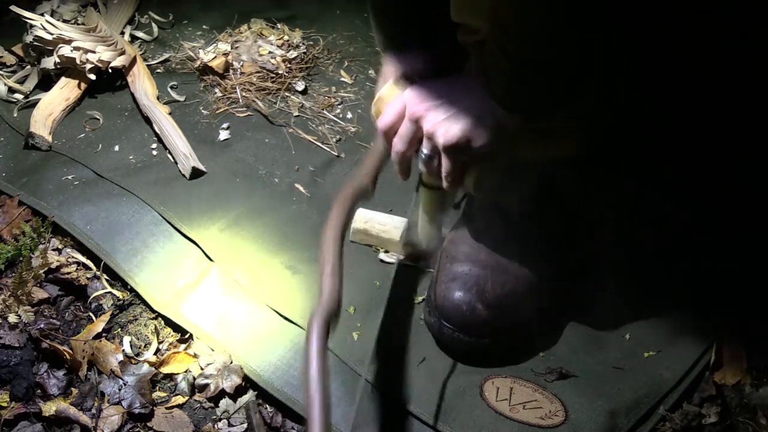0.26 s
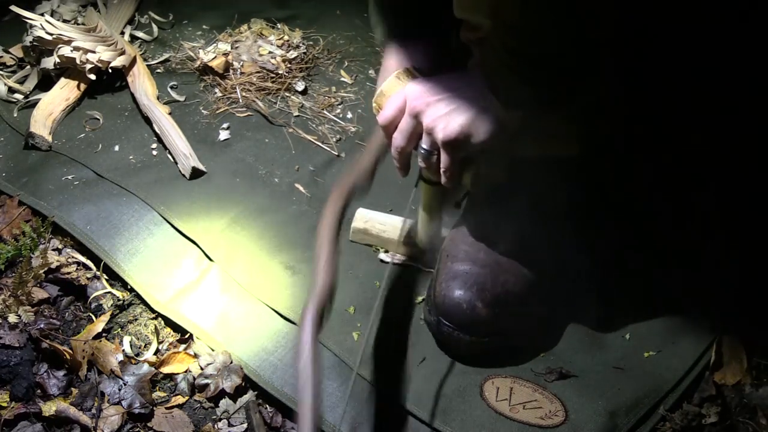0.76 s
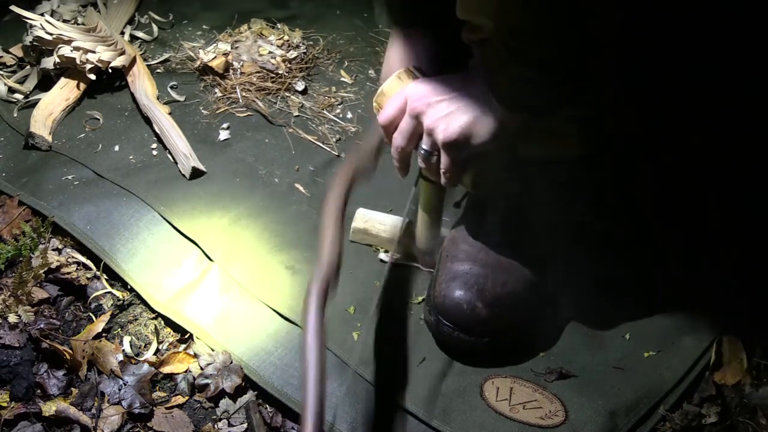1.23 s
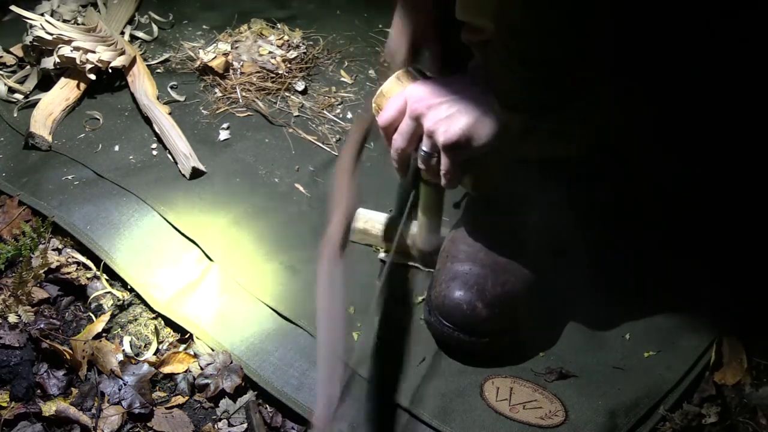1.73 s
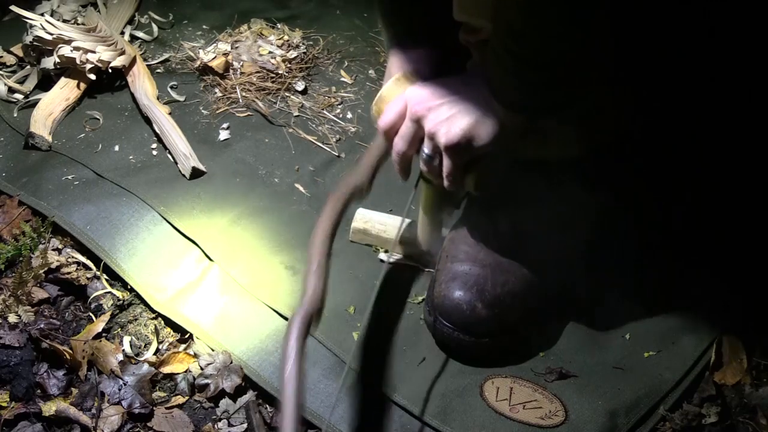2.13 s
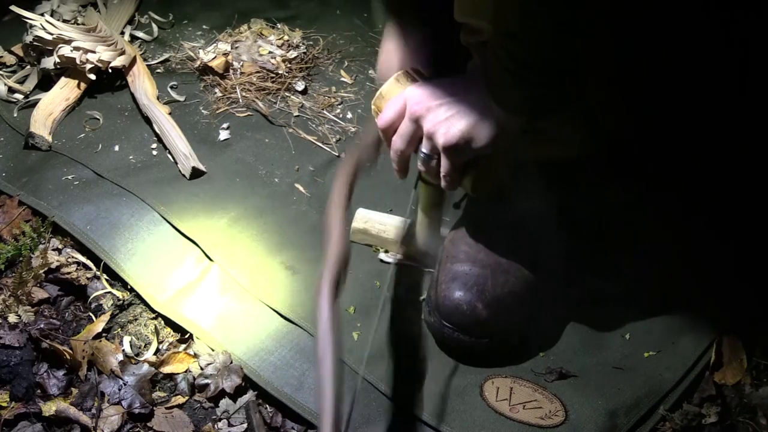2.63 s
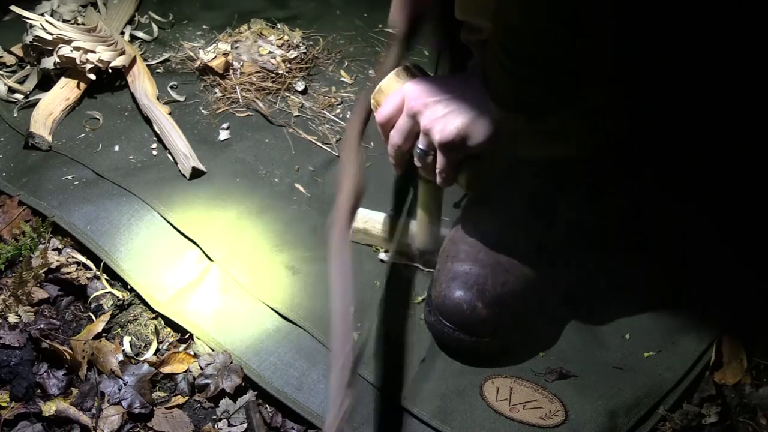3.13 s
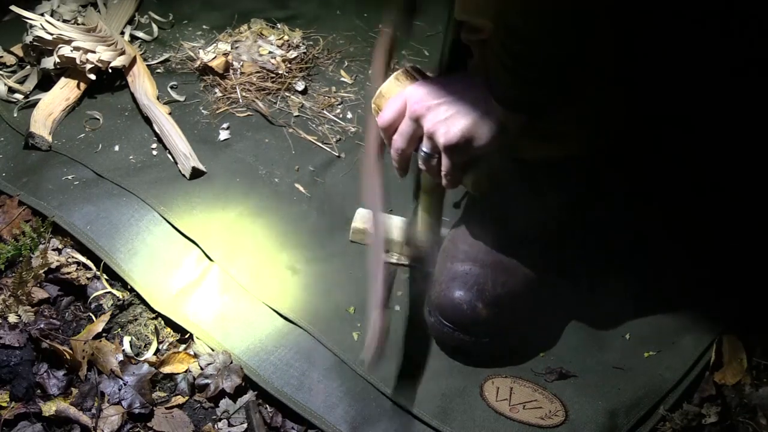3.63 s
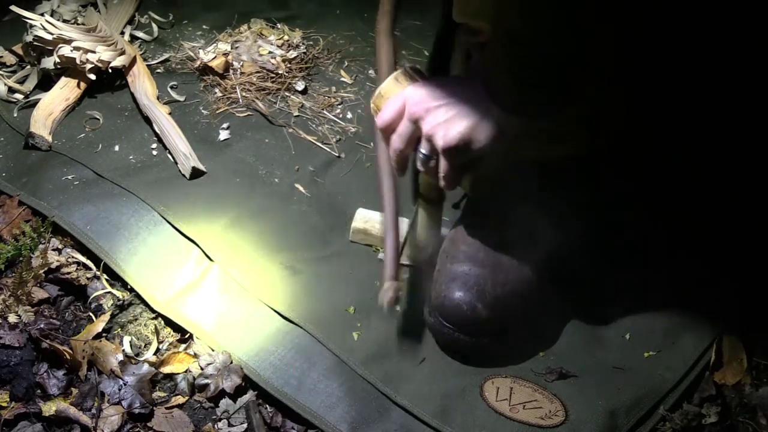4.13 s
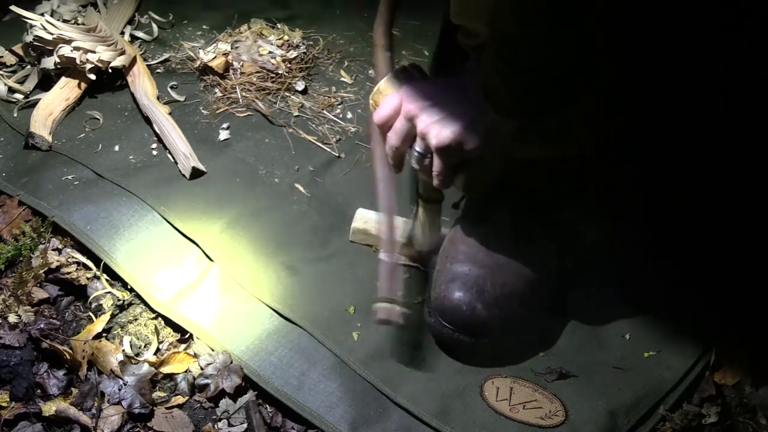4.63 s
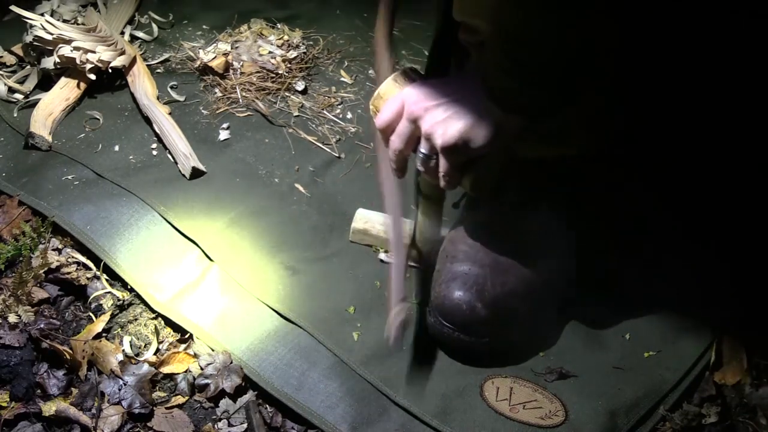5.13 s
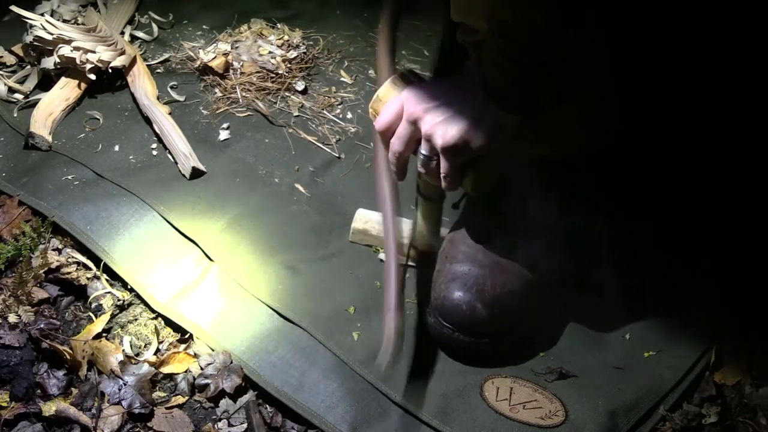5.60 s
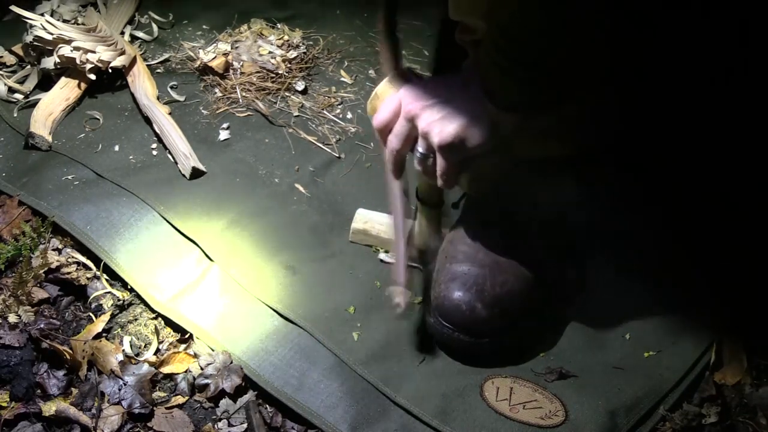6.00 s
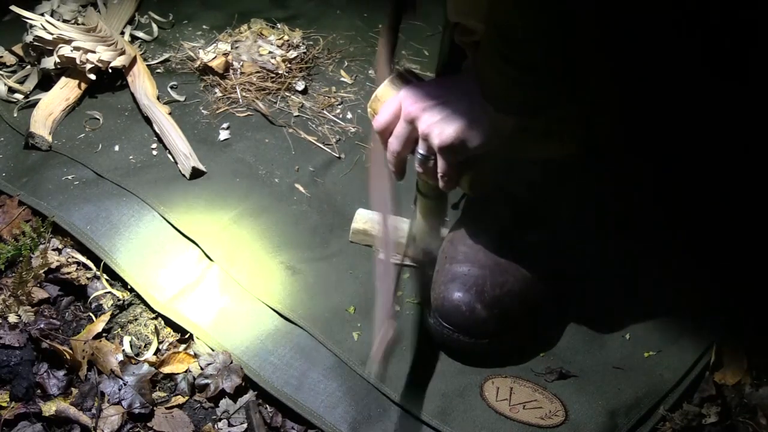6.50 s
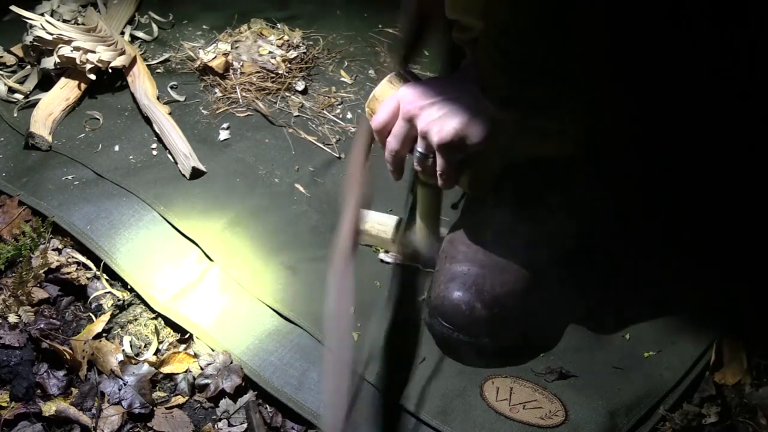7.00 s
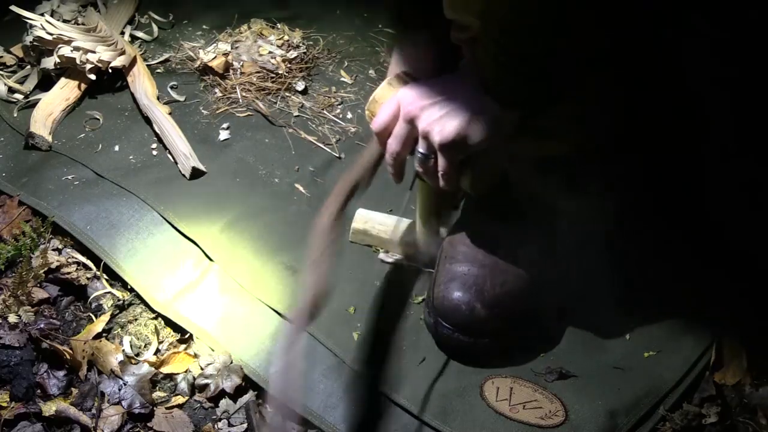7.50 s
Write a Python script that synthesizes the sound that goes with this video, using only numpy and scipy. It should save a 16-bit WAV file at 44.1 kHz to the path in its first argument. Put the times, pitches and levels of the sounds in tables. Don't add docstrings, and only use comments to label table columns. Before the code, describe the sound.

Very close in quiet woodland, a wooden spindle is driven back and forth by a bow in a fireboard notch. Steady grinding strokes, roughly four a second, mix low drumming, woody grit and bright fibre rasp. The cord snaps at the turns and the tip knocks. Piercing squeaks burst out early, once near the middle and again close to the end, over faint hiss and rumble.

```python
import sys
import numpy as np
from scipy import signal
from scipy.fft import rfft, irfft, next_fast_len
from scipy.io import wavfile
from scipy.ndimage import uniform_filter1d

SR = 44100
rng = np.random.default_rng(int(sys.argv[2]) if len(sys.argv) > 2 else 0)


def how_loud(loudness_db):
    steps = np.asarray(loudness_db, float) / 20
    return 10 ** steps


def store_wav(level_fs):
    pcm = np.round(np.clip(np.atleast_2d(level_fs), -1, 1) * 32767)
    wavfile.write(sys.argv[1], SR, pcm.T.astype(np.int16))


N = 341775
OVERLOAD = 0.53


def rms_one(x):
    return x / np.sqrt(np.mean(x ** 2) + 1e-20)


def at_hz(points, hz):
    table = np.array(points)
    return np.interp(np.log(hz + 1), np.log(table[:, 0] + 1), table[:, 1])


def resonate(x, hz, width_hz, count=1):
    r = np.exp(-np.pi * width_hz / SR)
    section = [(1 - r * r) / 2, 0, (r * r - 1) / 2, 1, -2 * r * np.cos(2 * np.pi * hz / SR), r * r]
    return signal.sosfilt([section] * count, x)


def judder(hz, width_hz):
    return rms_one(resonate(rng.standard_normal(N), hz, width_hz))


# (top speed [s], turn that ends it [s], effort [dB], grip of the tip [dB])
PUSH_STROKES = [(0.0, 0.082, -33, -6), (0.455, 0.566, -32, -0.5), (0.902, 1.039, -34, 0.5),
                (1.379, 1.49, -37.5, 6), (1.865, 1.964, -36, 1), (2.32, 2.431, -35, 0.5),
                (2.807, 2.882, -32, -1.5), (3.227, 3.344, -31.5, -1.5), (3.661, 3.789, -33, 1),
                (4.158, 4.253, -34.5, 0), (4.622, 4.727, -33, -1), (5.074, 5.18, -33, 0.5),
                (5.521, 5.629, -31.5, 1), (5.986, 6.075, -30.5, -1), (6.424, 6.527, -29, -3.5),
                (6.842, 6.965, -32.5, 2.5), (7.293, 7.409, -36, 1), (7.717, 7.847, -38.5, -2)]
# (turn that ends it [s], effort [dB], grip of the tip [dB])
PULL_STROKES = [(.327, -34, 0), (.803, -31.5, -2.5), (1.262, -37.5, -0.5), (1.724, -39, 2),
                (2.192, -35.5, -0.7), (2.653, -35, 0.9), (3.116, -34, 1.5), (3.562, -32.5, 0.8),
                (4.026, -38.5, -.3), (4.491, -35.5, 1.5), (4.956, -33.5, -0.5), (5.4, -33, -1),
                (5.852, -32.5, 0.2), (6.302, -32, -1.5), (6.745, -30.5, -0.2), (7.187, -36.5, 3),
                (7.629, -39, -2)]
# (in a push [dB], at its turn [dB], in a pull [dB], at its turn [dB])
LAYER_LEVELS = [
    (-12.5, -24.5, -13.5, -28.5),
    (0.24, -32, -0.1, -28.5),
    (1.1, -26, -0.7, -46),
    (-9, -32, -7.5, -47.5),
]


def strokes():
    push_top, push_end, push_db, push_grip_db = np.transpose(PUSH_STROKES)
    after_the_end = (8.1, -40, 0)
    pull_end, pull_db, pull_grip_db = np.transpose(PULL_STROKES + [after_the_end])
    pull_top = push_end + 0.5225 * (pull_end - push_end)
    s = np.ravel([push_top, push_end, pull_top, pull_end], order="F")
    effort_db = np.ravel([push_db, pull_db, pull_db, pull_db], order="F")
    levels_db = effort_db + np.tile(LAYER_LEVELS, len(PUSH_STROKES))
    levels_db[2, ::2] += np.ravel([push_grip_db, pull_grip_db], order="F")
    return s, levels_db


def stroke_place():
    s = strokes()[0]
    return np.interp(np.arange(N) / SR, s, np.arange(len(s)))


def stroke_gains(rises, falls):
    s, levels_db = strokes()
    place = stroke_place()
    row = np.minimum(place.astype(int), len(s) - 2)
    part = place - row
    gains = []
    for db, rise, fall in zip(levels_db, rises, falls):
        first, second = how_loud(db)[row], how_loud(db)[row + 1]
        up = second > first
        quarter = np.sin(np.pi / 2 * np.where(up, part, 1 - part) ** 0.85)
        speed = quarter ** np.where(up, rise, fall)
        gains.append(np.minimum(first, second) + np.abs(second - first) * speed)
    return gains


def friction(modes, per_s, spread_db, smooth, uneven_db, turn):
    torn = rng.random(N) < per_s / SR
    sizes_db = spread_db * np.minimum(rng.exponential(1, N), 3.0)
    grains = rms_one(torn * how_loud(sizes_db))
    drives = rng.standard_normal((2, 3, N)) * (grains + smooth)
    place = stroke_place()
    rows = np.arange(4 * len(PUSH_STROKES))
    push = (1 + np.round(np.cos(np.pi / 2 * rows))) / 2
    seat_db = 2.34 * rng.standard_normal((len(modes), len(rows)))
    out = 0
    for k, (hz, width_hz, db, push_db) in enumerate(modes):
        rung = resonate(drives[k % 2], hz, width_hz, count=2)
        gain = how_loud(db + push_db * push + seat_db[k])
        out = out + np.interp(place, rows, gain) * rung
    return rms_one(out * how_loud(uneven_db * np.clip(turn, -3, 2)))


# (frequency [Hz], width [Hz], level [dB], extra in a push [dB])
GROUND_MODES = [(95, 67, -7.5, -5), (176, 46, -2, 4.5), (252, 54, -7, 13), (335, 137, -5, 3.5)]


def ground_thud(turn):
    return friction(GROUND_MODES, per_s=270, spread_db=3.5, smooth=0.56, uneven_db=0.5, turn=turn)


# (frequency [Hz], width [Hz], level [dB], extra in a push [dB])
BOARD_MODES = [(428.7, 107, 0.5, -7), (554.5, 143, -6.5, 8.5), (746, 436, -3.5, -3), (1048, 297, -2, 3.5),
               (1190, 173, -4.5, 2.5), (1380, 450, -9.5, 0.5)]


def board_grind(turn):
    return friction(BOARD_MODES, per_s=500, spread_db=3.5, smooth=0.77, uneven_db=0.0, turn=turn)


# (frequency [Hz], width [Hz], level [dB], extra in a push [dB])
TIP_MODES = [(1931, 296, 1, 1), (2050, 150, -1, 1), (2197, 210, -2, 0.45), (2520, 230, -12, 0.39)]


def tip_ring():
    turn = judder(hz=59, width_hz=135)
    return friction(TIP_MODES, per_s=430, spread_db=5.5, smooth=0.7, uneven_db=1.0, turn=turn)


# (frequency [Hz], width [Hz], level [dB], extra in a push [dB])
FIBRE_MODES = [(2995, 740, -0.5, 4.3), (3550, 680, -5.5, 1), (4440, 900, -5.5, 2.6), (5030, 550, -4, 4),
               (5497, 430, 4, 0), (5780, 910, -4.5, -0.5), (8060, 850, -20.5, 4.5), (10850, 1900, -19.5, 3),
               (11900, 670, -21.5, 7.5), (14300, 14000, -23.5, 3)]


def fibre_rasp(turn):
    return friction(FIBRE_MODES, per_s=2500, spread_db=5.0, smooth=2.9, uneven_db=1.47, turn=turn)


def hum(slow_hz, fast_hz):
    speed = np.abs(np.cos(np.pi / 2 * stroke_place())) ** 1.8
    pitch = slow_hz + (fast_hz - slow_hz) * speed
    tone = np.sin(2 * np.pi * np.cumsum(pitch) / SR)
    return rms_one((0.57 + judder(hz=6.2, width_hz=27)) * tone)


def chirrup(swing_db, wander_hz):
    pitch = 2030 + wander_hz * judder(hz=17.3, width_hz=47.0)
    swing = how_loud(swing_db * np.clip(judder(hz=43.7, width_hz=54), -3, 2))
    return rms_one(swing * np.sin(2 * np.pi * np.cumsum(pitch) / SR))


# (frequency [Hz], level [dB])
AIR_COLOUR = [(12, -53), (20, -25), (410, -15), (1960, -1), (3950, -14), (11100, -27), (16000, -46)]


def air(loud, depth_db, recovery_s):
    hz = np.arange(N // 2 + 1) * SR / N
    spectrum = rfft(rng.standard_normal((2, N))) * how_loud(at_hz(AIR_COLOUR, hz))
    hiss = rms_one(irfft(spectrum, N))
    band = signal.butter(3, (55.6, 142), "band", fs=SR, output="sos")
    low = signal.sosfilt(band, rng.standard_normal((3, N)))
    rumble = rms_one(low[0] * np.array([[1.3], [-0.8]]) + 0.4 * low[1:])
    t = np.arange(N) / SR / recovery_s
    peak = np.log(np.clip(np.abs(loud) / OVERLOAD, 1e-6, 1))
    duck = np.exp(np.maximum.accumulate(peak + t) - t)
    return how_loud(-depth_db * duck ** 2) * (how_loud(-55) * hiss + how_loud(-55) * rumble)


def blows(rows, bodies, crack_t60):
    out, t = np.zeros(N + 1500), np.arange(1500) / SR
    grit = signal.lfilter([1, 0, -1], [1, -1.1, 0.45], rng.standard_normal((len(rows), 1500)))
    for (s, db, crack_db), body, noise in zip(rows, bodies, grit):
        at = round(s * SR)
        crack = how_loud(crack_db - 14.0 - 60 * t / crack_t60) * noise
        out[at:at + 1500] += how_loud(db) * (np.roll(body, 30) + crack)
    return signal.sosfilt(signal.butter(2, 250, "high", fs=SR, output="sos"), out[:N])


# (time [s], peak [dB], crack above the snap [dB])
CORD_SNAPS = [(0.073, -22.5, -12), (0.549, -21.5, -26), (1.027, -35, -37), (1.486, -31, -26),
              (1.947, -21, -9), (2.413, -19.5, -10), (2.876, -25.5, -30.5), (3.336, -24, -15),
              (3.785, -34, -22), (4.489, -30, -24), (4.717, -18.5, -5), (5.174, -22.5, -24),
              (5.624, -20.5, -19), (6.067, -18.5, -19.5), (6.521, -19, -34), (6.962, -28.5, -31),
              (7.398, -22, -9)]
# (frequency [Hz], level [dB], t60 [s])
SPINDLE_MODES = [(620, -9.5, 0.012), (924, -2.5, 0.021), (1200, -3, 0.0071), (1510, -1, .007),
                 (1950, -13, 0.0062), (3520, -7, 0.0067), (6700, -11, 0.011)]


def snaps():
    t = np.arange(1500) / SR
    change_db = 2 * rng.standard_normal((len(CORD_SNAPS), len(SPINDLE_MODES)))
    rings = [how_loud(db - 4.5 - 60 * t / t60) * np.sin(2 * np.pi * hz * t) for hz, db, t60 in SPINDLE_MODES]
    contact = np.minimum(t / 0.0003, 1)
    bodies = how_loud(change_db) @ np.array(rings) * contact
    return blows(CORD_SNAPS + np.array([0.0009, 0, 0]), bodies, crack_t60=0.008)


# (time [s], peak [dB], frequency [Hz])
NOTCH_KNOCKS = [(.415, -28, 1170), (.435, -26, 1190), (.453, -12, 1070), (1.879, -19, 541),
                (1.35, -21, 1108), (1.848, -28, 570), (2.355, -21.5, 1035), (2.78, -25, 560),
                (2.811, -17, 631), (3.188, -25.5, 1070), (3.229, -27, 1040), (3.628, -22.5, 1093),
                (3.65, -26, 612), (3.686, -19, 1196), (4.144, -26, 620), (4.177, -22.5, 589),
                (4.653, -18.5, 1082), (5.043, -17.5, 1043), (5.111, -23.5, 615), (5.522, -19, 1178),
                (5.987, -16.5, 540), (6.211, -29.5, 1015), (6.342, -27.5, 1155), (6.417, -18.5, 1114),
                (6.661, -22.5, 1027), (6.791, -29.5, 1027), (6.828, -29.5, 1078), (6.898, -23.5, 1050),
                (7.051, -23, 1190), (7.276, -24, 1118)]


def knocks(t60):
    s, db, hz = np.transpose(NOTCH_KNOCKS)
    t = np.arange(1500) / SR
    bodies = 0
    for ratio, share in [(1, 1.0), (0.602, 0.29), (1.5, 0.22)]:
        bodies = bodies + share * np.sin(2 * np.pi * ratio * hz[:, None] * t)
    crack_db = -38.5 - db
    return blows(np.transpose([s, db, crack_db]), bodies * how_loud(-60 * t / t60), crack_t60=0.019)


# (time of the top [s], peak [dB], frequency [Hz], growth [ms], collapse [ms])
TIP_SQUEAKS = [(0.4327, -12, 2030, 6.4, 1.5), (0.4547, -17, 2185, 1.8, 9.1), (0.479, -12, 1950, 4.8, 2.6),
               (0.917, -7, 1995, 2.7, 3.3), (0.9509, -8.5, 2024, 2.5, 5.2), (0.9606, -9, 1950, 0.84, 4.02),
               (1.3697, -6.0, 2034, 4.3, 2.3), (1.3779, -6.5, 1908, 4.5, 2.13),
               (1.3857, -11, 2090, 2.6, 2.36), (1.4039, -2.5, 2080, 4.2, 6.9), (1.409, -5, 1916, 8.4, 2),
               (2.3005, -17, 2143, 14, 1.6), (3.7034, -0.5, 2110, 1.7, 3.9), (3.7087, -4.5, 1954, 8.6, 4.9),
               (4.197, -15, 2050, 6.4, 2.5), (4.5687, -13, 1927, 5.6, 1.5), (5.0597, -16, 1970, 8.7, 3.28),
               (6.8446, -9, 2038, 4.9, 1.73), (6.8779, -9, 2030, 3.2, 5.3), (7.323, -2, 2160, 3.01, 5.7),
               (7.327, -3, 1970, 7, 2.9), (7.3496, -8.5, 1990, 6.1, 2.6), (7.3635, -12.5, 1950, 10, 5.7)]
# (time of the top [s], peak [dB], frequency [Hz])
TIP_CHIRPS = [(.463, -20, 1950), (0.6722, -18, 2224), (0.7059, -20, 2236), (0.9275, -15, 1950),
              (0.935, -23, 2148), (0.9686, -20.5, 2136), (1.831, -21, 2010), (2.314, -16, 2080),
              (2.3355, -15, 2050), (2.3476, -23, 1987), (2.7948, -16, 1973), (2.8062, -22, 2027),
              (3.6849, -11.5, 2080), (3.718, -23, 2218), (4.1634, -13, 2100), (4.169, -19.5, 1988),
              (4.6389, -13.5, 1982), (4.6831, -20.5, 1966), (5.1033, -17, 1949), (5.2933, -21, 1930),
              (5.5491, -21, 1973), (5.979, -20, 2140), (5.9941, -17, 2040), (6.3612, -19.5, 2030),
              (6.4467, -24, 1993), (6.8293, -27, 1990), (7.2546, -18, 2000), (7.2874, -19, 1980),
              (7.338, -14.5, 2230), (7.693, -22.5, 2040)]
CHIRP_GROWTH_MS, CHIRP_COLLAPSE_MS = 4.1, 3.695


def squeaks(sag, round_ms, drive_db, ceiling, lopsided):
    height, pitch = np.zeros(N), np.full(N, 2000.0)
    t = np.arange(-1200, 1200) / SR
    soft = np.sqrt(t ** 2 + (round_ms / 1000) ** 2) - round_ms / 1000
    chirps = [(*c, CHIRP_GROWTH_MS, CHIRP_COLLAPSE_MS) for c in TIP_CHIRPS]
    for s, db, hz, growth_ms, collapse_ms in TIP_SQUEAKS + chirps:
        burst = how_loud(db + drive_db - 11860.0 * soft / np.where(t < 0, growth_ms, collapse_ms))
        at = np.arange(round(s * SR) - 1200, round(s * SR) + 1200)
        sagging = hz * (1 - sag * np.tanh(t / 0.0043))
        pitch[at] = np.where(burst > height[at], sagging, pitch[at])
        height[at] = np.maximum(burst, height[at])
    height = height / (1 + (height / ceiling) ** 6) ** (1 / 6)
    angle = 2 * np.pi * np.cumsum(uniform_filter1d(pitch, size=40)) / SR
    even = 2 * np.cos(2 * angle) + 0.5 * np.cos(4 * angle)
    return height * (np.sin(angle) + lopsided * (height / ceiling) ** 4 * even)


def scrape(squeak, db, power):
    grit = resonate(rng.standard_normal(N), hz=3900, width_hz=2800, count=2)
    return how_loud(db) * rms_one(grit) * np.abs(squeak) ** power


# (time [s], peak [dB])
DRY_TICKS = [(0.8304, -45), (1.7627, -49), (2.2448, -38), (2.6618, -50), (3.1634, -38), (4.5301, -41.5),
             (5.4554, -41), (6.2974, -55), (6.4264, -33), (7.1344, -44), (7.2389, -42), (7.5454, -43.5),
             (7.5724, -42), (7.5854, -39), (7.655, -47)]


def ticks():
    rows = [(s, db, 6.0) for s, db in DRY_TICKS]
    return blows(rows, np.zeros((len(rows), 1500)), crack_t60=0.0066)


# (time of mid-stroke [s], level [dB])
CORD_HISSES = [
    (1.611, -62),
    (3.92, -58.5),
    (7.52, -58.5),
]


def cord():
    t = np.arange(N) / SR
    hiss = resonate(rng.standard_normal(N), hz=6000, width_hz=560, count=2)
    swell = sum(how_loud(db) * np.exp(-((t - s) / 0.081) ** 2) for s, db in CORD_HISSES)
    return rms_one(hiss) * swell


# (frequency [Hz], left minus right [dB])
BALANCE = [(150, -7), (380, -6.5), (1550, 1.5), (1960, 1.2), (2150, 2), (5000, 4), (8120, -5.5),
           (15000, -5)]
# (frequency [Hz], left lead beyond the lag [rad])
PHASE_LEAD = [(170, -.6), (900, .35), (1550, -.3), (1900, .1), (2100, .5), (3000, -.5), (4000, .5),
              (5500, -.5)]
# (frequency [Hz], share of direct sound [0-1])
DIRECT_SHARE = [(60, .9), (300, .95), (2200, .93), (2800, .65), (4000, .5), (5700, .85), (6500, .25),
                (15000, .25)]


def ports(rub, hits, trees_t60, trees_db, trees_cut_hz):
    size = next_fast_len(N + SR)
    hz, t = np.arange(size // 2 + 1) * SR / size, np.arange(SR) / SR
    tail = rng.standard_normal((2, SR)) * how_loud(-60 * t / trees_t60) * (t > 0.012)
    trees = how_loud(trees_db) * rfft(rms_one(tail) / np.sqrt(SR), size) / (1 + (hz / trees_cut_hz) ** 2)
    share = np.clip(at_hz(DIRECT_SHARE, hz), 0, 1)
    side = np.array([[0.5], [-0.5]])
    lag_s = 0.0001
    lead = np.exp(1j * side * (2 * np.pi * hz * lag_s + at_hz(PHASE_LEAD, hz)))
    rub = rfft(rub, size)
    direct = (np.sqrt(share) * rub[0] + rfft(hits, size)) * (lead + trees)
    scattered = np.sqrt(1 - share) * rub[1:]
    return irfft((direct + scattered) * how_loud(side * at_hz(BALANCE, hz)), size)[:, :N]


def scene():
    thud, grind, ring, rasp = stroke_gains(rises=[4.3, 2.36, 2.31, 1.31], falls=[2.04, 2.01, 2.22, 1.56])
    turn = judder(hz=27.3, width_hz=16)
    rub = thud * ground_thud(turn)
    rub += grind * board_grind(turn)
    rub += ring * tip_ring()
    rub += rasp * fibre_rasp(turn)
    hum_gain = thud ** 0.64 * how_loud(-18.5 + 3.0 * np.cos(np.pi / 2 * stroke_place()))
    squeak = squeaks(sag=0.0257, round_ms=0.52, drive_db=1.0, ceiling=0.64, lopsided=0.017)
    hits = 0.77 * hum_gain * hum(slow_hz=139.2, fast_hz=245.7)
    hits += how_loud(-8) * ring * chirrup(swing_db=3.5, wander_hz=111)
    hits += snaps() + knocks(t60=0.031) + squeak + ticks()
    near = ports(rub, hits, trees_t60=0.44, trees_db=-17.5, trees_cut_hz=1440)
    near = near + np.array([[1.3], [0.7]]) * scrape(squeak, db=-25.5, power=1.75)
    return near + cord() + air(squeak, depth_db=13.0, recovery_s=1.0)


def roll_off(x):
    return signal.sosfilt(signal.butter(12, 16160, fs=SR, output="sos"), x)


def record(dry):
    knee = 10.5
    held = dry / (1 + np.abs(dry / OVERLOAD) ** knee) ** (1 / knee)
    cut = signal.sosfilt(signal.cheby2(12, 60, 16050, fs=SR, output="sos"), held)
    cut = signal.sosfilt(signal.butter(2, 45, "high", fs=SR, output="sos"), cut)
    return roll_off(cut)


dry = scene()
out = record(dry)
store_wav(out)
```